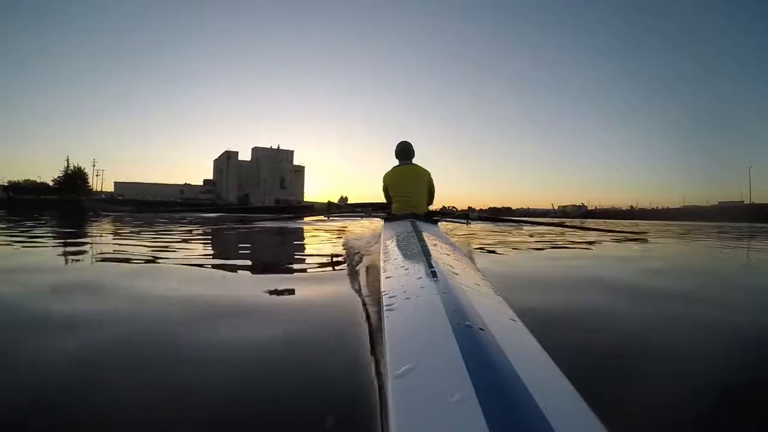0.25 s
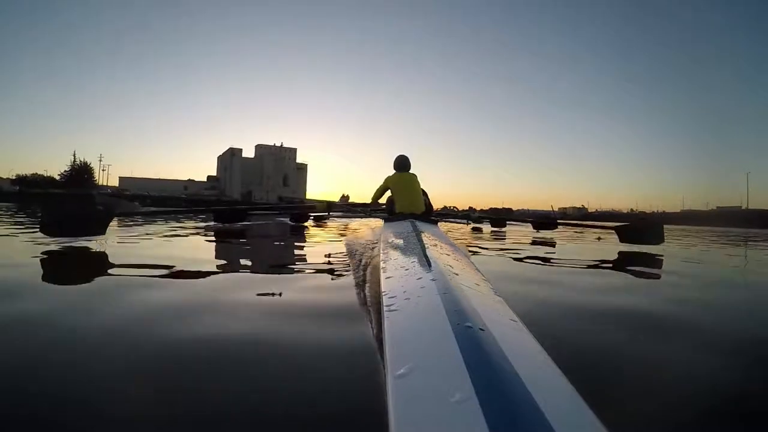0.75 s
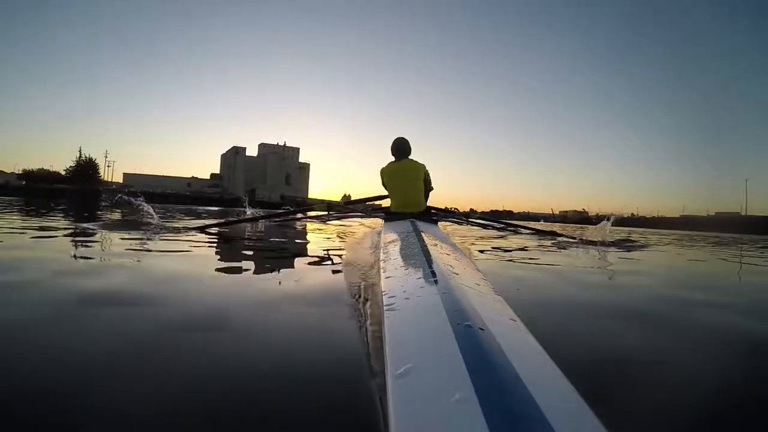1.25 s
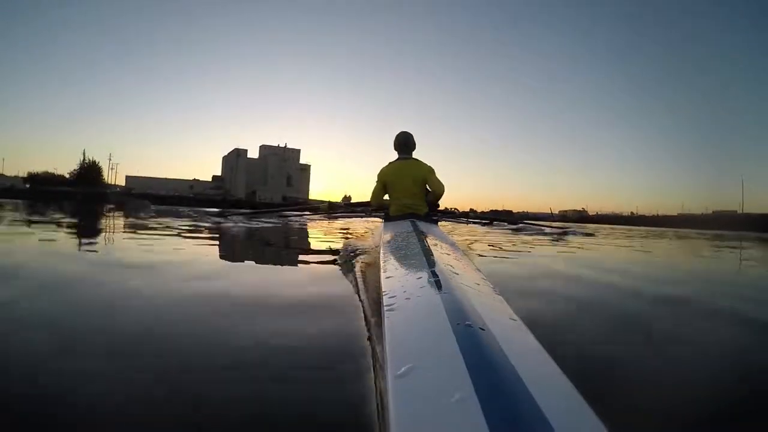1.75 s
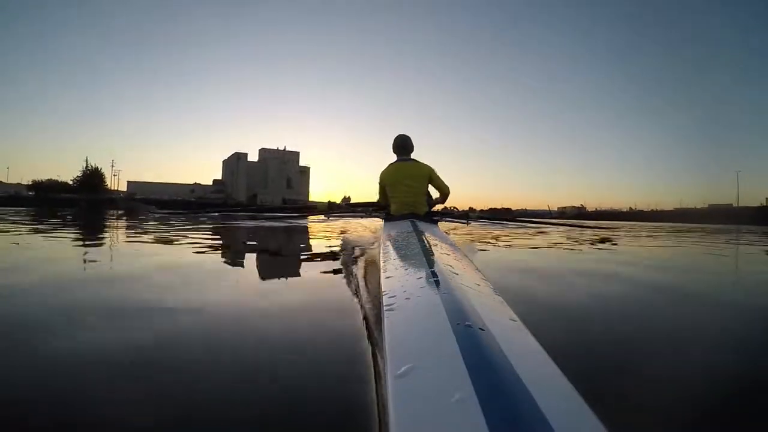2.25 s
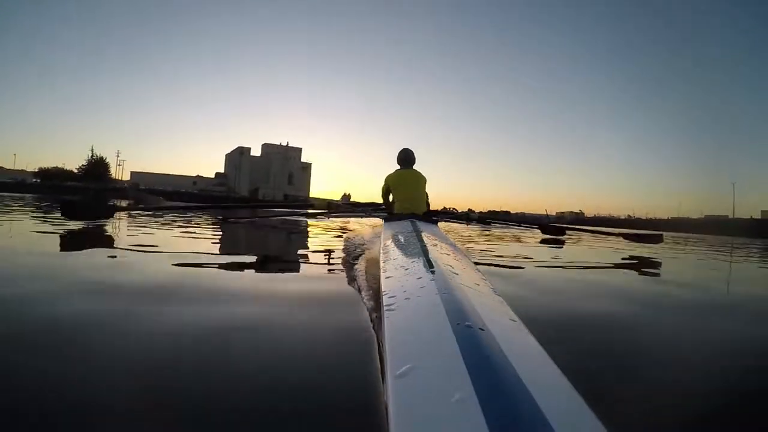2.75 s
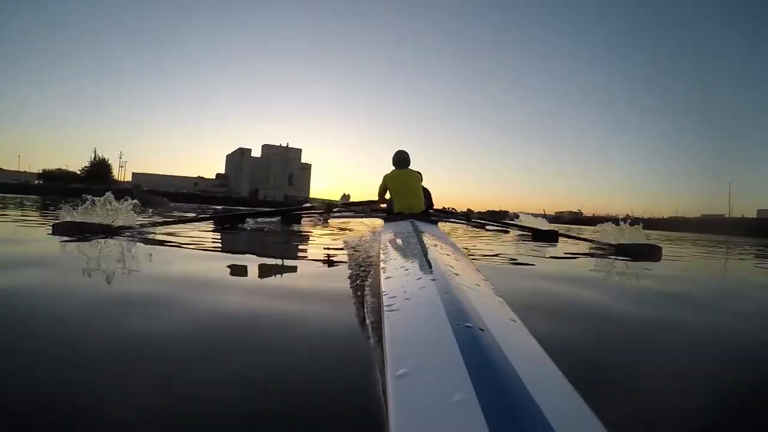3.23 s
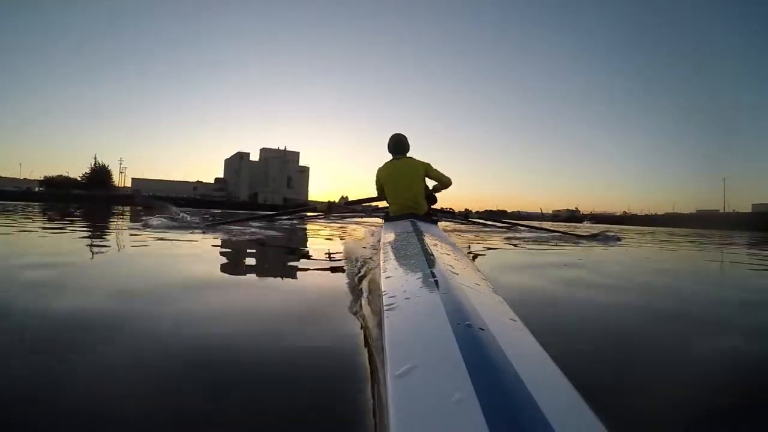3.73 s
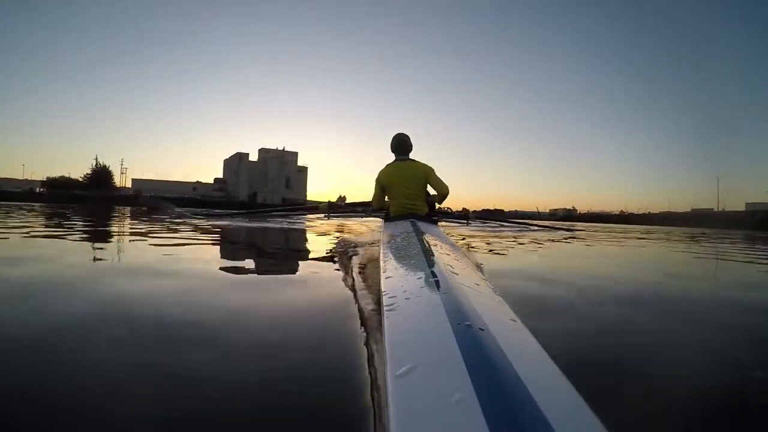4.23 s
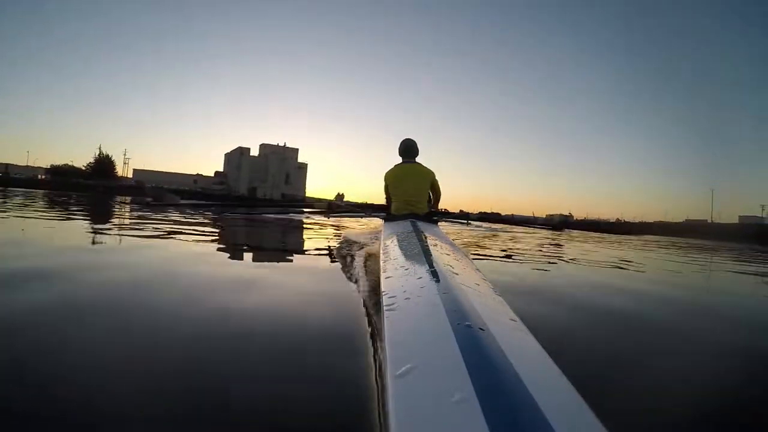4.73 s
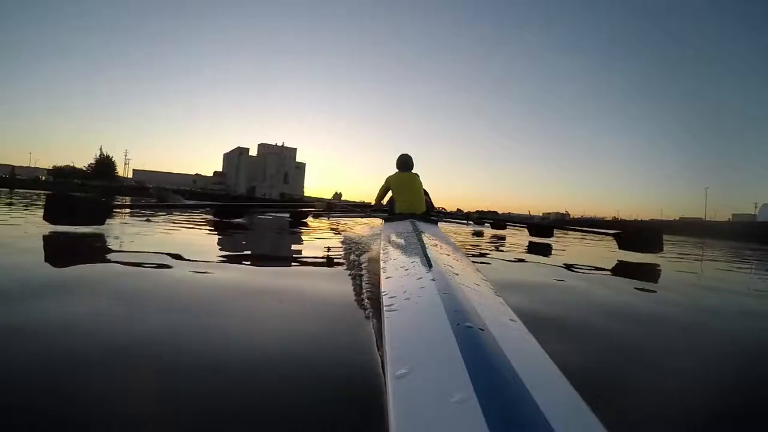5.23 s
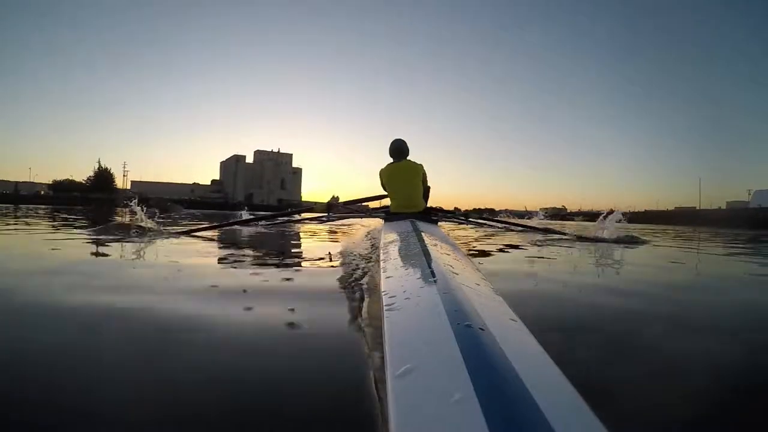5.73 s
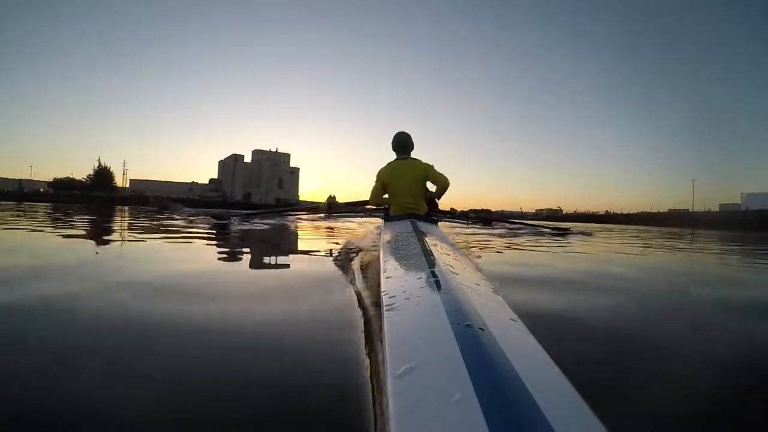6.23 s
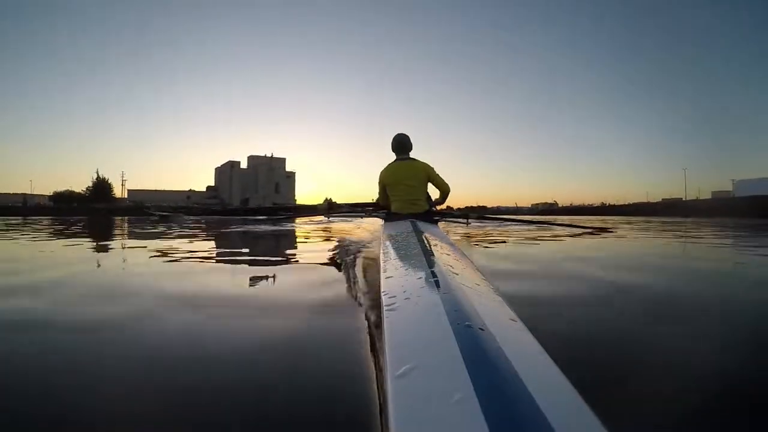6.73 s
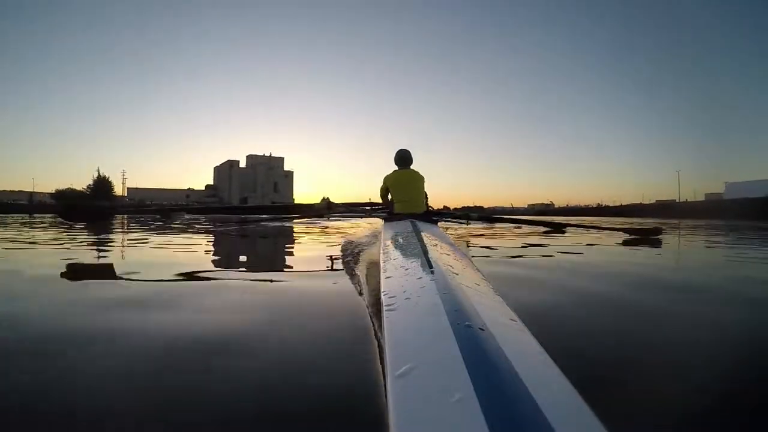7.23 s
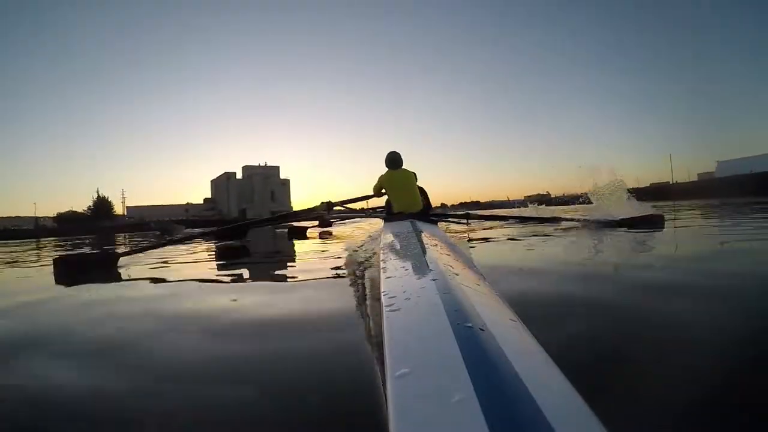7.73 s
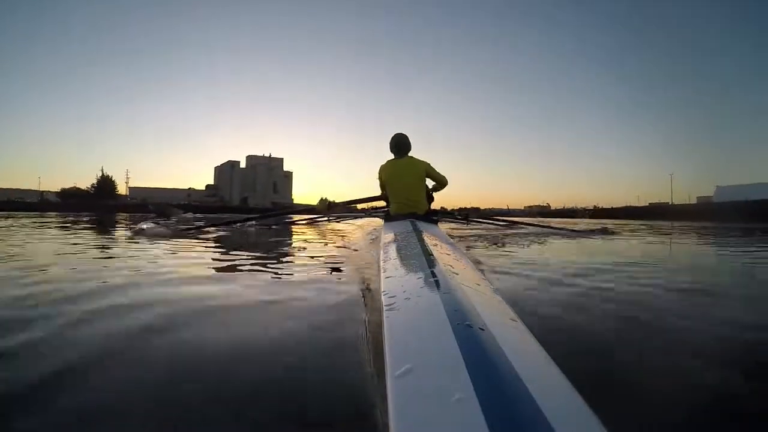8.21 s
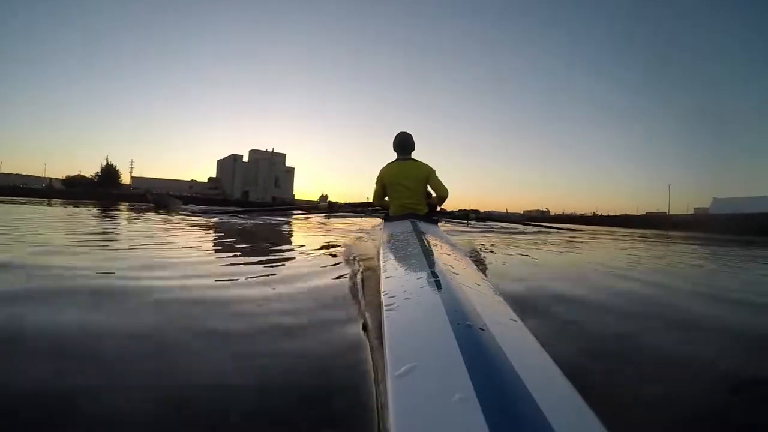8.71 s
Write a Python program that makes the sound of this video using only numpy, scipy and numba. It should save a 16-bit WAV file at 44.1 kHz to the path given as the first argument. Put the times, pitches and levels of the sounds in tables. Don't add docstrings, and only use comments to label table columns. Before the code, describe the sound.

Low wind buffets a microphone on a rowing shell while water fizzes, slaps and plops, and oarlocks clunk through the ringing hull every two seconds or so.

```python
import sys
import numpy as np
from scipy import signal
from scipy.fft import rfft, irfft, next_fast_len
from scipy.io import wavfile
from scipy.ndimage import uniform_filter1d
from numba import njit

SR = 44100
rng = np.random.default_rng(int(sys.argv[2]) if len(sys.argv) > 2 else 0)


def persist_wave(psi):
    counts = np.round(np.clip(psi, -1, 1) * 32767).astype(np.int16)
    wavfile.write(sys.argv[1], SR, np.atleast_2d(counts).T)


def nominal_scale(level):
    x = np.asarray(level, float) / 20
    return 10 ** x


N = 395577

# pitch in Hz, width in Hz, level in dB.
HULL = [
    (52.3, 8.6, 3),
    (172, 43, -4),
    (195.3, 38.3, -4),
    (328.8, 31, -2.5),
    (370, 18, 0),
    (402.5, 41, -1),
    (443.2, 68, -9.5),
]
# frequency in Hz, density in dB per Hz.
SPRAY = [(710, -33), (1200, -19.5), (1350, -5), (1830, 0), (3130, -8), (4160, -5.5), (4920, -9),
         (5700, -7.5), (6890, -17.5), (7660, -18.5), (9360, -30), (10600, -32), (12300, -44.5),
         (14000, -47), (14900, -83)]
# release in seconds, rush off the blades in dB, then drumming, wash, spray and
# hull bending in dB above the usual.
STROKES = [
    (-.55, -33, -0.79, 3.5, -0.43, -3),
    (1.71, -32, 0.7, 1.2, 0.48, -0.5),
    (3.97, -26, 0.46, 1.1, 0.094, -0.5),
    (6.25, -29, -0.54, -0.1, 0.21, -6),
    (8.48, -27.5, 0.48, 1, -0.12, -3.5),
]


def level(x, db):
    return x * nominal_scale(db) / np.sqrt(np.mean(x ** 2))


@njit
def svf(x, hz, width):
    y, band, low = np.empty(len(x)), 0., 0.
    g, k = np.tan(np.pi * hz / SR), width / hz
    for i in range(len(x)):
        v = (band + g * (x[i] - low)) / (1 + g * (g + k))
        band, low, y[i] = 2 * v - band, low + 2 * g * v, k * v
    return y


def svf_twice(x, hz, width):
    hz, width = float(hz), float(width)
    return svf(svf(x, hz, width), hz, width)


def colour(x, points):
    hz, db = np.transpose(points)
    size = next_fast_len(N, True)
    log_hz = np.log(np.fft.rfftfreq(size, 1 / SR) + 1)
    gain = nominal_scale(np.interp(log_hz, np.log(hz), db, left=-90, right=-90))
    return irfft(rfft(x, size) * gain, size)[:N]


def walk(rate):
    hop = 64
    hold = max(int(SR / hop / rate), 1)
    count = N // hop + 1
    steps = rng.standard_normal(count)[np.arange(count) // hold]
    slow = 1.1 * uniform_filter1d(uniform_filter1d(steps, hold), hold)
    return np.interp(np.arange(N) / hop, np.arange(count), slow)


def patchy(points, shared_db, own_db, rate):
    out, shared = 0, walk(rate)
    lo, hi = np.log2(max(points[0][0], 20)), np.log2(points[-1][0])
    for hz in 2 ** np.arange(lo, hi, 1 / 3):
        patch = level(svf(rng.standard_normal(N), hz, hz / 4), 0)
        flicker_db = shared_db * shared + own_db * walk(1.5 * rate)
        out = out + np.sqrt(hz) * patch * nominal_scale(flicker_db)
    return level(colour(out, points), 0)


def add(out, s, sound):
    i = int(s * SR)
    out[i:i + len(sound)] += sound[:N - i]


def swells(rows):
    out = np.zeros(N)
    for s, db, length in rows:
        length = max(length, .001)
        t = np.arange(-int(length * SR), int(2 * length * SR)) / SR
        side = length * np.where(t < 0, .35, .65)
        add(out, s + t[0], nominal_scale(db) * np.exp(-np.abs(t / side) ** 1.7))
    return out


def ring(hz, t60, swell, sag=0.):
    t = np.arange(5000) / SR
    shape = (1 - np.exp(-t / swell)) ** 2 * np.exp(-np.log(1000) * t / t60)
    bent_t = t + sag * 0.0061 * (1 - np.exp(-t / 0.0037))
    return shape / shape.max() * np.sin(2 * np.pi * hz * bent_t)


@njit
def bubbles(start, hz, cycles, size, glide):
    out = np.zeros(N)
    for k in range(len(start)):
        length = cycles[k] * SR / hz[k]
        phase, w = 0., 2 * np.pi * hz[k] / SR
        for i in range(min(int(5 * length), N - start[k])):
            phase += w * (1 + glide * i / length)
            onset = min(phase / 9, 1.) ** 2
            out[start[k] + i] += size[k] * onset * np.exp(-i / length) * np.sin(phase)
    return out


def drops(rows, cycles, glide, gain_db):
    s, db, hz = np.transpose(rows)
    return bubbles((s * SR).astype(int), 1. * hz, np.full(len(s), cycles), nominal_scale(db + gain_db), glide)


def fizz(count, lo_hz, hi_hz, cycles, spread_db):
    when, pitch, loudness, damping = rng.random((count, 4)).T
    clumps = np.cumsum(nominal_scale(4.5 * walk(28.)))
    start = np.searchsorted(clumps, when * clumps[-1])
    hz = lo_hz * (hi_hz / lo_hz) ** pitch
    size = nominal_scale(-spread_db * np.log(1.01 - loudness)) * np.sqrt(hz)
    return bubbles(start, hz, cycles * (.5 + damping), size, 0.054)


def strokes():
    # seconds since release, then hull drumming, wash, bow-wave spray and hull bending in dB.
    cycle = [
        (0.0, -14, -33, -35, 1),
        (0.09, -15.5, -34.5, -36.5, 4),
        (0.26, -23, -37.5, -38.5, 4),
        (0.45, -72, -34, -36.5, 7.5),
        (0.75, -27, -33.5, -36.5, -3.5),
        (1.099, -21.5, -33.5, -33.5, 4.5),
        (1.56, -18, -34, -35, 6),
        (1.68, -21.5, -32.5, -35.5, -8.5),
        (1.93, -30.5, -35, -37, -11.5),
        (2.167, -36.5, -32, -37, -13.5),
    ]
    t, starts, s = np.arange(N) / SR, np.array(STROKES)[:, 0], np.array(cycle)[:, 0]
    k = np.searchsorted(starts, t, "right") - 1
    length = np.diff(starts, append=2 * starts[-1] - starts[-2])
    since, out = t - starts[k], []
    closing = np.clip((since - s[-1]) / (length[k] - s[-1]), 0, 1)
    for usual, extra in zip(np.transpose(cycle)[1:], np.transpose(STROKES)[2:]):
        usual_db = np.interp(since, s, usual) + closing * (usual[0] - usual[-1])
        out.append(usual_db + np.interp(t, starts + length / 2, extra))
    return out


def hums():
    # pitch in Hz, width in Hz, level in dB.
    tones = [
        (984, 1.5, -49),
        (1184, 1.5, -49),
    ]
    return sum(level(svf(rng.standard_normal(N), 1. * hz, 1. * width), db) for hz, width, db in tones)


def wind(bend_db):
    # frequency in Hz, density in dB per Hz.
    eddy_points = [(7.1, -38), (12, -1.5), (43, 0.5), (65, 0), (113, -8.5), (173, -9.5), (261, -19),
                   (399, -18.5), (571, -37.5), (700, -44.5), (910, -75), (1540, -120)]
    # time in seconds, level in dB.
    gusts = [(0.0, -13), (0.05, -20.5), (1.1, -15.5), (1.12, -17.5), (1.65, -15.5), (3.92, -18.5),
             (3.97, -15.5), (5.12, -15.5), (5.22, -23), (5.3, -15.5), (6.07, -19.5), (6.24, -14),
             (6.9, -13.5), (6.92, -17.5), (7.22, -12.5), (8.44, -18), (8.54, -18), (8.97, -12.5)]
    eddies = patchy(eddy_points, shared_db=3.0, own_db=4.0, rate=22.)
    hz, width, db = HULL[0]
    buffet = eddies + nominal_scale(db + bend_db) * svf(eddies, 1. * hz, 1. * width)
    glide = swells([(s + .8, -1.5, .75) for s, *_ in STROKES[1:]])
    buffet = (1 - glide) * buffet + glide * nominal_scale(5.5) * svf(eddies, 96.0, 70.)
    even = 0.48
    buffet = buffet / uniform_filter1d(buffet ** 2 + 1e-3, size=3500) ** (even / 2)
    gust_db = np.interp(np.arange(N) / SR, *np.transpose(gusts)) + 1.93
    return nominal_scale(gust_db) * level(buffet, 0.43)


def mist(spray_db, steep=2.3):
    specks = fizz(count=14000, lo_hz=8500., hi_hz=14800., cycles=14., spread_db=0.5)
    port = [(7500, -33.5), (9000, -8.0), (12500, -4.0), (14900, -16.5), (15300, -48.0)]  # (Hz, dB)
    return level(colour(specks, port) * nominal_scale(steep * spray_db + 1.2 * walk(10.0)), -71)


def trickle(spray_db, steep=3.6):
    plops = fizz(count=2600, lo_hz=1108.0, hi_hz=3600.0, cycles=8.7, spread_db=4.0)
    return level(colour(plops, SPRAY) * nominal_scale(steep * spray_db), -44.5)


def water(wash_db, spray_db):
    # frequency in Hz, density in dB per Hz.
    wash_points = [(260, -39), (450, -1.5), (578, -2), (723, 0), (1180, -6.5), (1340, -11.5), (1720, -21),
                   (2000, -18), (2600, -32), (4400, -120)]
    gurgle = fizz(count=2000, lo_hz=443.3, hi_hz=1700.0, cycles=9.3, spread_db=3.5)
    wash = patchy(wash_points, shared_db=2.0, own_db=-0.5, rate=18.)
    wash = wash + level(colour(gurgle, wash_points), -6.5)
    froth = fizz(count=8000, lo_hz=1416.0, hi_hz=12570.0, cycles=4., spread_db=1.5)
    spray = patchy(SPRAY, shared_db=-0.06, own_db=3.5, rate=22.)
    spray = spray + level(colour(froth, SPRAY), -0.45)
    wake = level(svf_twice(rng.standard_normal(N), 4190, 740), -50.0)
    wake = wake + level(svf_twice(rng.standard_normal(N), 5820, 800), -61.5)
    return nominal_scale(wash_db) * level(wash, 0.93) + nominal_scale(spray_db) * level(spray, 0.33) + wake


def drips():
    # start in seconds, peak in dB, pitch in Hz.
    gulps = [(0.349, -24, 637), (0.433, -21, 695), (0.593, -26, 750), (0.748, -19.5, 644), (1.05, -21, 720),
             (1.106, -18, 637), (1.215, -20.5, 580), (1.663, -26.5, 644), (2.6, -28, 1080),
             (2.619, -30.5, 620), (3.225, -30, 700), (3.349, -22.5, 833), (3.539, -13.5, 582),
             (3.742, -27, 810), (3.803, -26.5, 646), (3.855, -17, 727), (3.928, -28.5, 1000),
             (3.982, -15, 974), (4.033, -27, 704), (4.104, -25, 616), (5.308, -27.5, 697),
             (5.361, -16.5, 890), (5.75, -32.5, 980), (5.843, -25, 630), (6.235, -17.5, 650),
             (6.811, -24, 566), (6.96, -24, 700), (7.172, -16, 765), (7.189, -23.5, 780),
             (7.475, -21.5, 683), (7.604, -18, 840), (7.838, -27, 546), (7.854, -17, 940),
             (7.935, -15.5, 770), (8.516, -13, 904)]
    trapped = [(0.43, -21.5, 1690), (0.7392, -22, 1840), (0.9355, -28, 1860), (0.9762, -21, 2100),
               (1.1049, -20.5, 2020), (1.1553, -23, 2020), (1.228, -26.5, 1810), (1.2454, -18.5, 1700),
               (2.0068, -24.5, 1680), (2.1355, -23, 1690), (2.3635, -26, 1800), (2.5112, -21.5, 2020),
               (2.788, -17.5, 2250), (2.8394, -11.5, 1500), (2.9493, -17, 2060), (3.1188, -22, 1320),
               (3.1777, -17, 2070), (3.2261, -23, 2170), (3.4331, -18.5, 1920), (3.922, -22, 1490),
               (4.1689, -23.5, 2040), (4.4024, -31, 2070), (4.4228, -17, 2100), (4.5101, -27, 1220),
               (4.6184, -18.5, 1170), (4.7526, -25, 1840), (4.7656, -20, 2100), (4.928, -18.5, 1216),
               (4.9821, -25, 2050), (5.082, -17.5, 1560), (5.1044, -21, 1310), (5.2255, -20, 1660),
               (5.3083, -21, 1720), (5.5707, -17, 2060), (5.8963, -25, 1790), (6.1384, -27, 1550),
               (6.2773, -25.5, 1870), (6.322, -17, 1880), (6.5181, -23, 1850), (6.823, -20, 1810),
               (6.974, -33, 1680), (7.1801, -22, 2120), (7.295, -22, 2280), (7.4155, -33, 1800),
               (7.436, -18.5, 2250), (7.5123, -17, 2140), (7.5777, -25, 1720), (7.8072, -16, 2230),
               (7.9109, -23, 2480), (8.516, -19, 1480), (8.783, -22, 1840), (8.8199, -24, 2260),
               (0.755, -23.5, 2270), (3.136, -24, 3600), (3.97, -19, 4220), (4.0566, -15, 3600),
             (7.338, -24, 1880), (7.375, -22, 1860), (7.857, -22, 1900)]
    ticks = [(0.2094, -22, 4420), (0.2823, -32, 4090), (0.3361, -31, 5730), (0.5013, -32, 5600),
             (0.5117, -25, 4100), (0.6569, -20, 4000), (0.6923, -34, 4030), (0.7332, -35, 4010),
             (0.7617, -20.5, 4010), (0.8864, -27, 4630), (0.9303, -25, 6000), (1.6741, -33, 3650),
             (1.7629, -26, 4110), (2.1924, -26, 5270), (2.4688, -30, 4870), (2.9188, -28, 4300),
             (2.9607, -25, 6000), (3.0674, -20.5, 5760), (3.1847, -28, 4320), (3.4047, -27, 5650),
             (3.4311, -25, 3970), (3.466, -24, 4600), (3.5344, -25, 4180), (3.693, -28, 3870),
             (4.3331, -34, 5260), (4.6189, -31, 6150), (4.9267, -25.5, 4000), (5.0644, -24, 4540),
             (5.1801, -28, 5300), (5.3143, -26, 4400), (5.3223, -29, 4730), (5.5054, -33, 5120),
             (5.5712, -31, 4470), (5.6101, -25, 4190), (5.6326, -25, 4480), (6.0207, -32, 3900),
             (6.2502, -24, 4060), (6.3116, -35, 5240), (6.3215, -32, 3880), (6.8009, -25, 5230),
             (7.2509, -24, 4540), (7.3073, -42, 3800), (7.3347, -21, 4220), (7.3816, -31, 3900),
             (7.7423, -27, 4040), (7.9793, -29.5, 4000), (8.4173, -29, 5620), (8.9176, -29, 5840)]
    specks = [(0.4554, -49, 8770), (0.5107, -45, 8520), (0.5362, -37, 9000), (0.5931, -48, 8540),
              (0.6524, -43, 10600), (0.6918, -49, 8830), (0.8864, -43, 8600), (3.1213, -51, 9220),
              (3.5109, -42, 8790), (3.6007, -42, 8900), (4.6189, -50, 8810), (4.9267, -47, 8670),
              (5.0724, -44, 8870), (5.3637, -46, 8830), (5.5887, -41, 8910), (5.6096, -43, 9170),
              (5.6326, -39, 8860), (5.6521, -46, 9220), (5.7324, -48, 8890), (6.324, -38, 9300),
              (7.0314, -42, 8930), (7.2444, -47, 8700), (7.3078, -47, 8840), (7.3961, -49, 9290),
              (7.4145, -46, 8520), (7.6515, -48, 9290), (7.9728, -54, 8880), (8.2357, -45, 8500)]
    # frequency in Hz, gain in dB.
    case = [
        (200, 0),
        (6500, 0),
        (8500, -10),
        (13000, -26),
        (15000, -60),
    ]
    cased = drops(gulps, cycles=4.8, glide=0.024, gain_db=-0.5)
    cased = cased + drops(trapped, cycles=4.05, glide=0.03, gain_db=3.)
    cased = cased + drops(ticks, cycles=12.3, glide=0.022, gain_db=1.0)
    return colour(cased, case) + drops(specks, cycles=10.0, glide=.01, gain_db=5.0)


def spurts():
    # centre in seconds, level in dB,
    # fineness from -1 coarse to 1 mist, length in seconds.
    spray_bursts = [(0.214, -37, -0.62, .005), (0.458, -52, 1.2, .012), (0.521, -32, 0.084, 0.014),
                    (0.548, -31.5, 0.35, 0.009), (0.623, -37, -0.018, 0.015), (0.762, -31, -0.45, 0.011),
                    (0.891, -30, 0.25, 0.0076), (1.389, -39, 0.52, 0.0064), (1.67, -40, -0.59, 0.0095),
                    (1.725, -31, -0.18, 0.0079), (2.195, -32.5, 0.14, 0.014), (2.618, -38, 0.29, 0.041),
                    (2.97, -41, 0.41, .01), (3.134, -34, -0.41, 0.014), (3.523, -35.5, 0.41, 0.017),
                    (3.964, -39, -0.17, 0.015), (4.929, -36.5, 0.23, 0.039), (5.079, -29.5, 0.25, 0.02),
                    (5.417, -34, -0.94, 0.018), (5.624, -32.5, 0.3, 0.025), (5.362, -41, 0.54, 0.023),
                    (6.335, -36.5, -0.3, 0.017), (6.557, -38.5, -0.99, 0.025), (7.251, -33.5, 0.38, 0.021),
                    (7.332, -38, -0.78, 0.016), (7.456, -32.5, -0.95, 0.009), (7.98, -27, 0.082, 0.006),
                    (0.545, -48, 1.3, .002), (0.653, -31, 0.52, 0.0024), (4.62, -24.5, 0.37, 0.003),
               (4.929, -19.5, -0.3, 0.0016), (5.383, -39, 0.73, 0.002), (5.6, -46, 1, .0033),
               (6.324, -19.5, 0.1, 0.0046), (6.344, -30, -0.4, 0.0026), (7.031, -44, 0.69, .01),
               (7.305, -33, 0.37, 0.014), (5.192, -34.5, -0.86, 0.04), (8.11, -44, 0.47, 0.68)]
    s, mid_db, fine, length = np.transpose(spray_bursts)
    low_db = mid_db - 1.5 - 6 * fine
    top_db = mid_db - 22.5 + 23 * fine
    parts = ((low_db, (1400, 2800), 1), (mid_db, (3200, 7200), 1), (top_db, (7500, 14500), .82))
    out = 0
    for db, edges_hz, depth in parts:
        sos = signal.butter(4, edges_hz, "bandpass", fs=SR, output="sos")
        case = [(hz, depth * case_db) for hz, case_db in SPRAY]
        grain = rng.standard_normal(N) * nominal_scale(1.5 * walk(250.))
        scale = np.std(colour(signal.sosfilt(sos, grain), case))
        bursts = grain * swells(zip(s, db + .5, length))
        out = out + colour(signal.sosfilt(sos, bursts), case) / scale
    return out


def slaps():
    # start in seconds, peak in dB, pitch in Hz.
    thumps = [(0.395, 3, 154), (0.591, 3.5, 175), (1.651, 7.5, 200), (1.7, 3, 193), (2.178, -2, 193),
              (2.522, 1, 200), (2.604, 2, 105), (2.638, 1.5, 260), (3.302, 4, 173), (3.739, 1, 109),
              (4.204, 5.5, 113), (4.309, 5, 148), (4.402, 2, 162), (4.448, 6, 100), (4.5, -3, 92),
              (4.566, -1, 105), (4.657, -1, 116), (4.752, -5, 78), (4.816, 3, 75), (4.896, 6.5, 85.5),
              (4.959, -4, 96), (5.587, 2, 173), (5.618, 1, 184), (6.166, -5, 172), (6.36, 4, 177),
              (6.422, -3, 161), (6.715, 0, 209), (6.872, 1, 97), (7.07, -6, 167), (7.128, -10, 100),
              (7.22, -4, 130), (7.295, 7, 128), (7.363, 4.5, 132), (7.433, 5, 119), (7.567, -5, 137),
              (8.407, 0.5, 165), (8.457, 0, 180), (8.491, -1, 185), (8.521, 0, 208)]
    # start in seconds, peak in dB, pitch in Hz, edge in dB.
    raps = [(0.394, -15, 257, -11), (0.593, -13, 242, 4), (1.229, -18, 556, -18), (2.012, -26, 248, -7),
            (2.178, -8, 237, -10), (2.393, -13.5, 288, -23), (2.435, -24, 405, -7), (2.523, -19, 250, -21),
            (2.621, -10.5, 275, 5.5), (3.745, -17, 282, 2), (4.32, -16, 370, -17), (4.401, -27, 274, -12),
            (4.424, -17, 260, -20), (4.451, -14.5, 304, -24), (4.568, -11.5, 333, -14),
            (4.665, -11.5, 273, -4), (4.7, -19, 250, -20), (4.747, -12.5, 350, -19), (4.782, -11, 278, -28),
            (4.836, -17, 360, -7), (4.9, -17, 257, -14), (6.714, -18, 248, 3), (6.808, -17, 450, 3.5),
            (6.872, -14.5, 340, -22), (6.937, -14.5, 261, -9), (7.01, -12, 272, -20),
            (7.107, -22, 376, -12), (7.138, -14.5, 318, -16), (7.19, -12.5, 388, -17),
            (7.239, -18, 248, -21), (7.295, -10.5, 420, 1), (7.474, -10.5, 277, -8), (7.933, -20, 370, 5)]
    out = np.zeros(N)
    for s, db, hz in thumps:
        add(out, s, -nominal_scale(db - 8.0) * ring(hz, t60=0.041, swell=0.0029, sag=0.06))
    edge = ring(694, t60=0.013, swell=0.0024) + ring(890, t60=0.0067, swell=0.00092)
    for s, db, hz, edge_db in raps:
        body = ring(hz, t60=0.027, swell=0.00086, sag=0.054)
        add(out, s, -nominal_scale(db + 5.0) * (body + nominal_scale(edge_db - 10.5) * edge))
    return out


def pour(late_s=0.012, length_s=0.067):
    churn = level(fizz(count=9000, lo_hz=700., hi_hz=2035.0, cycles=9.4, spread_db=6.5), -2.6)
    return svf(churn, 770.0, 1800.) * swells([(s + late_s, db, length_s) for s, db, *_ in STROKES[1:]])


def releases():
    # start in seconds, peak in dB, pitch in Hz.
    shudders = [
        (1.721, -6.5, 46.5),
        (3.96, -9, 45),
        (5.579, -7, 62.3),
        (6.2, -11, 56.5),
        (8.518, -4.5, 56.5),
        (8.6, -6.5, 50),
        (8.68, -7, 44.6),
    ]
    rush = svf_twice(rng.standard_normal(N) * nominal_scale(2.9 * walk(90.)), 1150, 1400)
    rush = level(svf(rush, 1150., 2500.), -2.8)
    out = rush * swells([(s, db, 0.22) for s, db, *_ in STROKES[1:]])
    fade = np.hanning(10000)[5000:] ** 0.27
    for s, db, hz in shudders:
        add(out, s, nominal_scale(db) * ring(hz, t60=0.35, swell=.015) * fade)
    return out


def drumming(drum_db):
    push = rng.standard_normal(N) * nominal_scale(3.1 * walk(45.))
    modes = sum(nominal_scale(db) * svf_twice(push, hz, 1.19 * width) for hz, width, db in HULL[1:])
    return nominal_scale(drum_db) * level(modes, 0.0)


def knocks(t60=0.058, swell=0.008, early_s=.004, split=.12, second_db=-11.5):
    # start in seconds, peak in dB, pitch in Hz.
    jolts = [(0.735, -11, 390), (0.761, 1, 363), (0.797, 3, 378), (0.92, 1, 400), (0.943, -6, 345),
             (0.978, -13, 364), (1.082, 2, 383), (2.817, -4, 367), (2.841, -12, 370), (2.919, -9.5, 389),
             (3.082, -2, 362), (3.101, -4, 426), (3.118, -4.5, 446), (3.13, -4, 378), (3.244, -17, 460),
             (3.281, -5, 420), (5.061, -10, 402), (5.231, 3, 381), (5.282, 3.5, 403), (5.319, -1, 354),
             (5.345, -2, 392), (5.389, -8.5, 375), (5.413, -1, 402), (5.431, -7, 390), (5.528, -0.5, 380),
             (5.552, -8, 434), (7.305, -2, 341), (7.568, 1.5, 390), (7.626, 1.5, 390), (7.665, 3, 398),
             (7.849, -6.5, 398), (7.886, -7, 388)]
    feathers = [(1.661, -9.5, 420), (1.746, -1, 340), (1.816, -9, 400), (3.905, -14, 376),
                (3.941, -8.5, 341), (3.977, -2, 310), (4.002, -8, 360), (4.02, -11.5, 370),
                (4.068, -17, 423), (4.244, -6.5, 336), (6.235, -1.5, 307), (6.273, -24, 348),
                (6.317, -6, 362), (6.374, -7.5, 415), (8.46, -11, 320), (8.514, -5, 384), (8.583, -4, 344),
                (8.624, -5, 398), (8.672, -10, 300)]
    out = np.zeros(N)
    for s, db, hz in jolts + feathers:
        neighbour = nominal_scale(second_db) * ring(hz * (1 - split), t60, swell)
        add(out, s - early_s, nominal_scale(db - 6.0) * (ring(hz, t60, swell) + neighbour))
    return out


def scene():
    drum_db, wash_db, spray_db, bend_db = strokes()
    air = hums() + wind(bend_db)
    bow = mist(spray_db) + trickle(spray_db) + water(wash_db, spray_db) + drips() + spurts() + slaps()
    rowing = pour() + releases() + drumming(drum_db) + knocks()
    return (air + bow + rowing)[None]


def band_limit(x):
    return signal.sosfilt(signal.butter(12, 15020, fs=SR, output="sos"), x)


def record(dry):
    limited = 0.96 * np.tanh(dry / 1.123)
    return band_limit(limited)


dry = scene()
out = record(dry)
persist_wave(out)
```